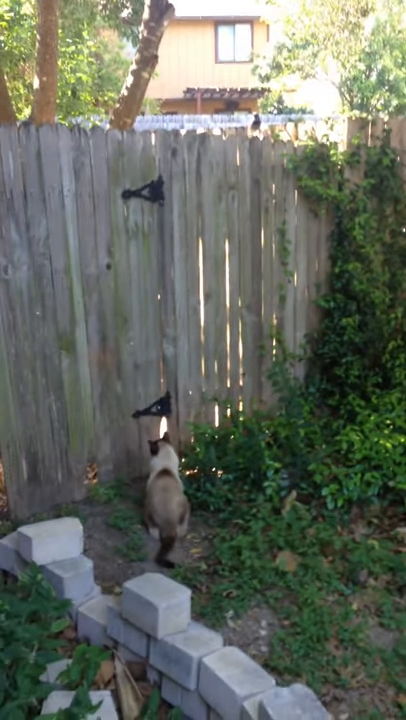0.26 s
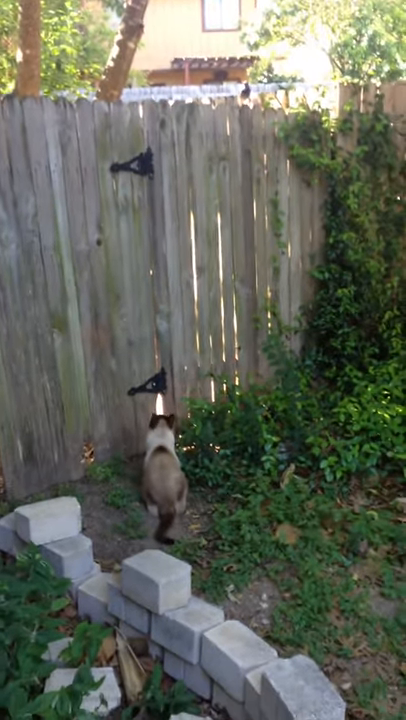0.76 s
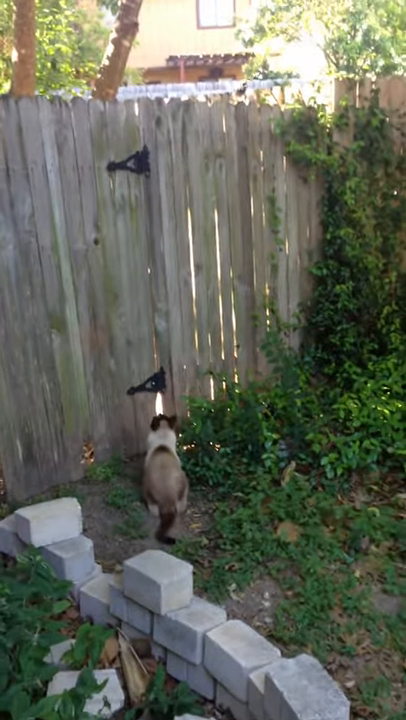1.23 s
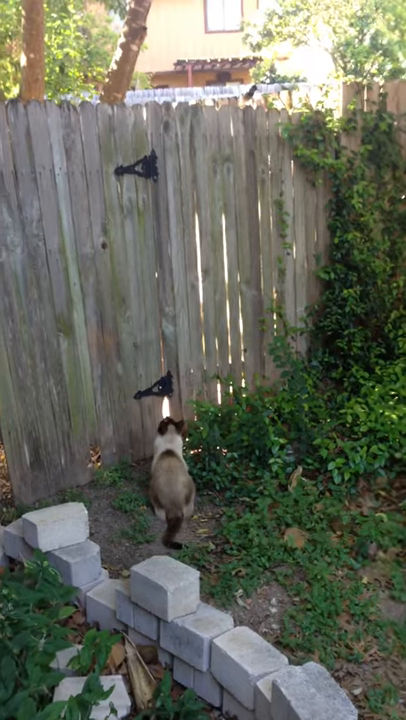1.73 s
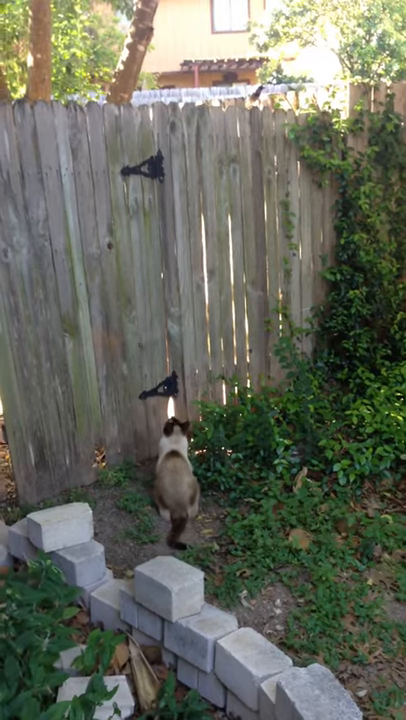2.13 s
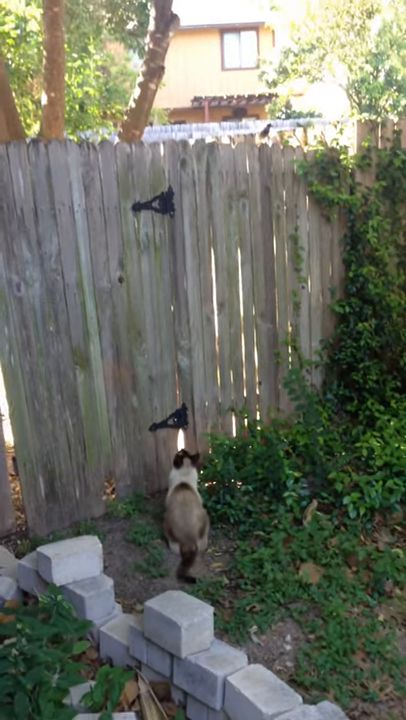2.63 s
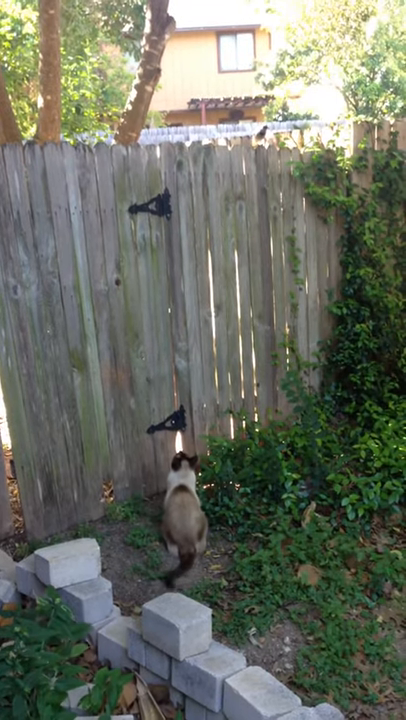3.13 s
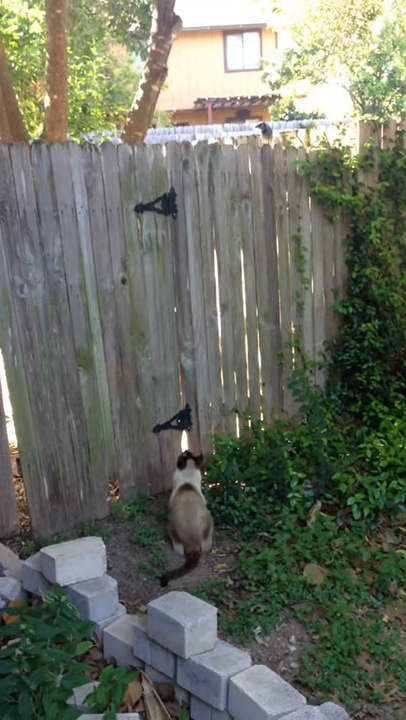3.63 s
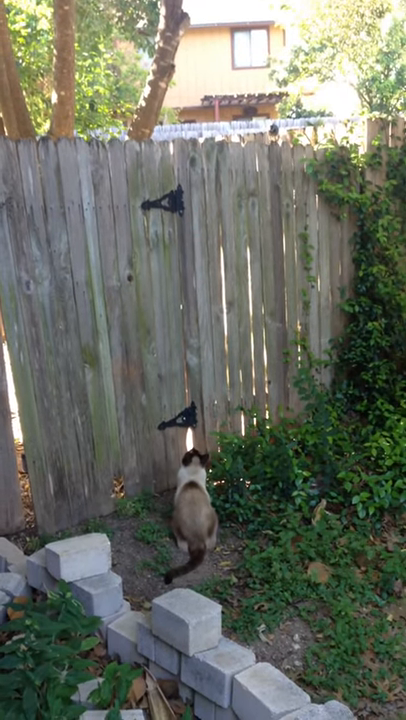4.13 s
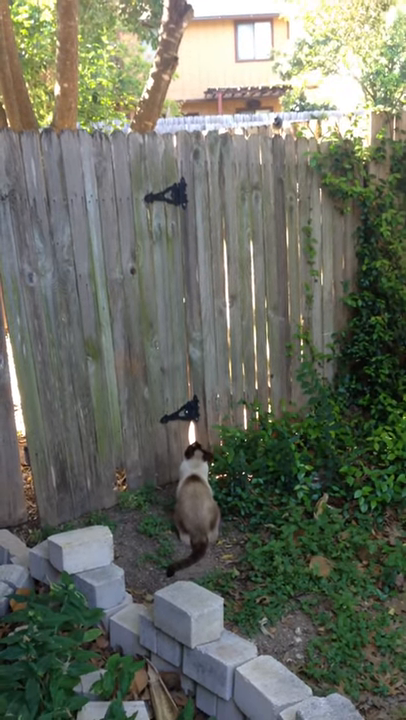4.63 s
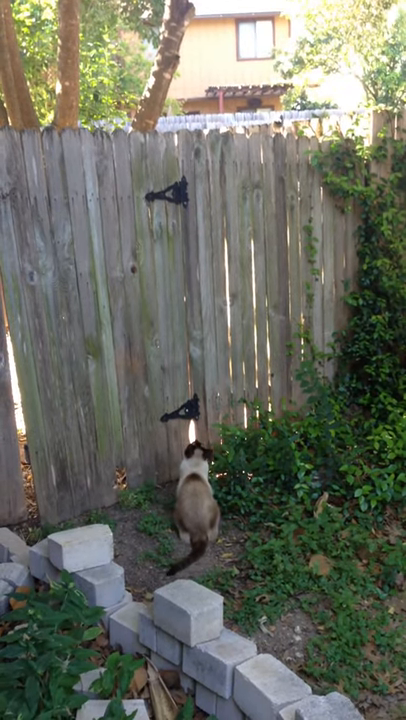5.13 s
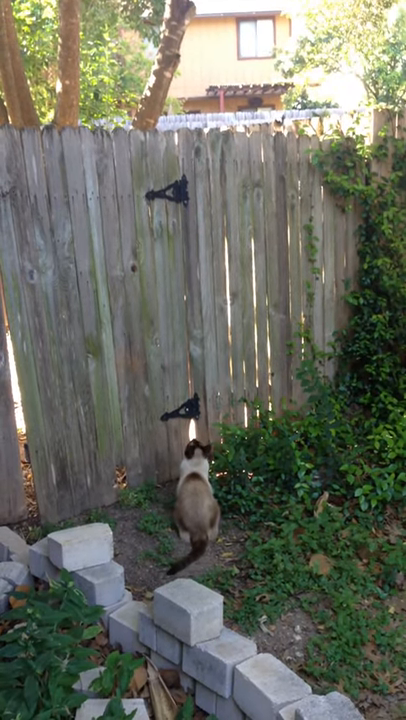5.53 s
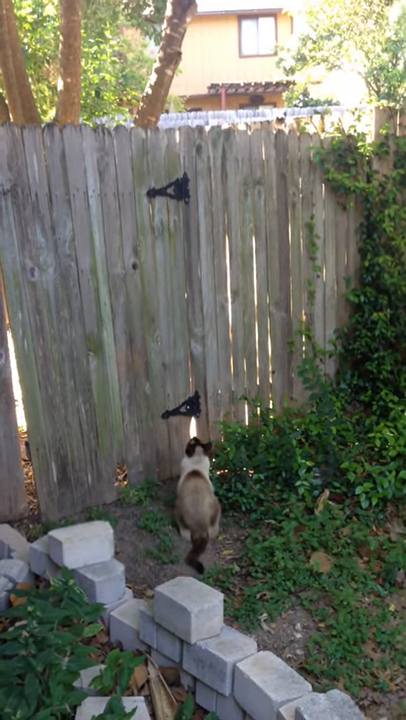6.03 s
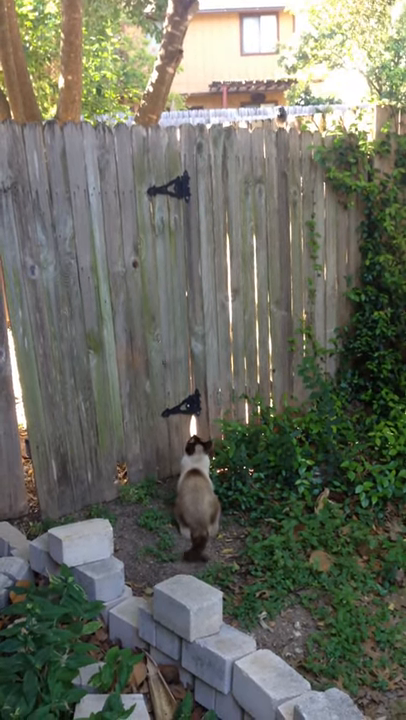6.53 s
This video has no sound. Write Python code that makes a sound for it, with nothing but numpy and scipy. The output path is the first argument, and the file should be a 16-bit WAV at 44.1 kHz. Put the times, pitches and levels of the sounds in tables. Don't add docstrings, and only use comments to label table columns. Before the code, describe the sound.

A nearby jay scolds in two quick pairs of piercing, raspy screams, the third the most strained. Between and after them come low, throaty dove coos from farther away, with small sparrow chirps and a faint buzzing bird call. Dry leaves click softly. Beneath lies steady far traffic, leaf rustle, a very faint machine hum and thin insect whine, picked up by a phone in a yard with short reflections.

```python
import sys
import numpy as np
from scipy import signal
from scipy.fft import rfft, irfft
from scipy.io import wavfile
from scipy.ndimage import uniform_filter1d

SR = 44100
rng = np.random.default_rng(int(sys.argv[2]) if len(sys.argv) > 2 else 0)


def gain_from_db(level_db):
    decades = np.asarray(level_db, float) / 20
    return 10 ** decades


def unload_wav(signal):
    wavfile.write(
        sys.argv[1],
        SR,
        np.round(np.clip(np.atleast_2d(signal).T, -1, 1) * 32767).astype(np.int16),
    )


N = 298116


def evened(x):
    return x / np.sqrt(np.mean(abs(x) ** 2) + 1e-20)


def read(points, hz):
    f, value = np.transpose(points)
    return np.interp(np.log(hz + 1), np.log(f + 1), value)


def curves(rows):
    s, *columns = np.transpose(rows)
    t = np.arange(s[0], s[-1], 1 / SR)
    return t, *(np.interp(t, s, c) for c in columns)


def shape(t, times, values):
    return np.interp(t, np.maximum.accumulate(times), values)


def add(mix, start_s, sound):
    part = mix[round(start_s * SR):][:len(sound)]
    part += sound[:len(part)]


def drift(size, hz):
    z = rng.standard_normal((size + 2000, 2)) @ [1, 1j]
    return evened(signal.lfilter(*signal.butter(2, hz, fs=SR), z)[2000:])


def coloured(x, spectrum):
    gain = gain_from_db(read(spectrum, np.fft.rfftfreq(len(x), 1 / SR)))
    return evened(irfft(rfft(x) * gain, len(x)))


def air():
    # freq_hz, density_db (per Hz)
    wash_spectrum = [(25, -32), (40, -5.5), (60, -4.5), (120, -1.5), (170, -0.5), (260, -13.5),
                     (330, -11.5), (450, -18), (650, -12.5), (900, -20), (1900, -24), (2900, -23.5),
                     (4500, -22.5), (7500, -26), (12000, -30.5), (15300, -31)]
    # centre_hz, width_hz, level_db
    machine = (1780, 70, -71.5)
    # time_s, level_db
    insect_level = [(0, -68), (.55, -78), (.9, -85), (2.2, -84), (2.55, -75), (3.3, -87), (4.3, -80),
                    (4.9, -73), (5.25, -84.5), (5.9, -94), (6.4, -70.5), (6.76, -78)]
    wash_db, insect_hz = -54.5, 14500

    frames, hz = N // 256 + 5, np.fft.rfftfreq(1024, 1 / SR)
    a, b, patches = rng.standard_normal((frames, 513, 3)).T
    patches = uniform_filter1d(patches, 12, 0)
    patches_db = 1.2 * evened(uniform_filter1d(patches, 14, 1))
    z = (a + 1j * b) * gain_from_db(read(wash_spectrum, hz)[:, None] + patches_db)
    wash = gain_from_db(wash_db) * evened(signal.istft(z, nperseg=1024, noverlap=768)[1][:N])

    t = np.arange(N) / SR
    hum_hz, hum_width_hz, hum_db = machine
    hum = gain_from_db(hum_db) * (drift(N, hum_width_hz) * np.exp(2j * np.pi * hum_hz * t)).real
    insect_gain = gain_from_db(np.interp(t, *np.transpose(insect_level)))
    insect = insect_gain * (drift(N, 12) * np.exp(2j * np.pi * insect_hz * t)).real
    return wash + hum + insect


def whistle(rows, hoarse, flutter_hz, edge_s):
    t, hz, db = curves(rows)
    flutter = evened(1 + hoarse * drift(len(t), flutter_hz))
    tone = np.exp(2j * np.pi * np.cumsum(hz) / SR) * flutter
    edges = np.clip(np.minimum(t - t[0], t[-1] - t) / edge_s, 0, 1)
    return np.sqrt(2) * gain_from_db(db) * tone.real * edges


def sparrow():
    # start_s, level_db
    chirps = [
        (.42, -65),
        (3.28, -59),
        (5.325, -63.5),
    ]
    # after_s, length_s, first_hz, top_hz, last_hz
    strokes = [
        (0, .054, 3366, 4900, 3090),
        (.042, .013, 5490, 4600, 3630),
        (.072, .028, 4290, 4900, 3900),
        (.104, .052, 3110, 3700, 2700),
    ]
    out = np.zeros(N)
    for start_s, db in chirps:
        for after_s, length_s, first_hz, top_hz, last_hz in strokes:
            rows = [(0, first_hz, db - 2), (length_s / 2, top_hz, db + 4), (length_s, last_hz, db)]
            add(out, start_s + after_s, whistle(rows, hoarse=.35, flutter_hz=100.1, edge_s=0.0022))
    return out


def yard(x):
    # freq_hz, t60_s
    far_decay = [
        (500, 1),
        (1500, 0.38),
        (4000, 0.53),
        (10000, 0.21),
    ]
    fence_t60_s, fence_db = .14, 12.5
    taps = np.zeros(SR)
    at = np.arange(200, SR - 20, 20)
    taps[at + rng.integers(0, 20, len(at))] = rng.choice([-1., 1.], len(at))
    hz, t, z = signal.stft(taps, SR, nperseg=256)
    decay = gain_from_db(-60 * t / read(far_decay, hz)[:, None]) + gain_from_db(fence_db - 60 * t / fence_t60_s)
    tail = signal.istft(z * decay, SR, nperseg=256)[1]
    return signal.fftconvolve(x, tail / np.linalg.norm(tail))[:N]


def sub_lines(phase, steady_s):
    size, lines = len(phase) // 64 + 1, np.arange(5, 80)
    z = rng.standard_normal((size, len(lines), 2)) @ [1, 1j]
    z = signal.lfilter([1], [1, -np.exp(-64 / SR / steady_s)], z, axis=0)
    z = z * (1 + 1.5 * (lines % 4 == 0))
    strength = np.repeat(z, 64, 0)[:len(phase)]
    return evened((strength * np.exp(1j * phase[:, None] * lines / 4)).real.sum(1))


def scream(rows, break_s, overtones_db, hoarse_db, strain):
    # freq_hz, density_db (per Hz)
    rasp_spectrum = [(650, -92), (1100, -60), (1460, -15.5), (2010, -26), (2190, -8.5), (2550, 1),
                     (2970, -14.5), (3390, -3.5), (3820, -0.5), (4860, -10.5), (6050, -6), (12200, -26),
                     (15000, -32.5)]
    # multiple, level_db
    clear = [(1, -37.5), (2, -23), (3, -16), (4, 0), (5, -21.5), (6, -18.5), (7, -18), (8, -4), (9, -12.5),
             (10, -13.5), (11, -15.5), (12, -18), (13, -21), (14, -20.5), (15, -27), (16, -23), (17, -30),
             (18, -30), (19, -47)]
    # multiple, level_db
    strained = [(1, -30), (2, -25), (3, -31.5), (4, 0), (5, -23.5), (6, -24), (7, -40), (8, -16), (9, -26),
                (10, -17), (11, -38), (12, -45.5), (13, -44.5), (14, -39), (15, -36.5), (16, -37.5),
                (17, -73), (18, -44.5), (19, -70)]
    settle_s, crack_s, release_s = 0.057, .1, 0.02

    t, hz, fourth_db = curves(rows)
    start, end = t[0], t[-1]
    stages = [start, start + settle_s, break_s, break_s + crack_s, end]
    release_db = -15 * np.clip(1 - (end - t) / release_s, 0, 1)

    start_db, settled_db, spent_db = -31.5, -4.5, -13.5
    bright_stages = [start, start + .3 * settle_s, start + settle_s, break_s, end - release_s]
    bright_db = shape(t, bright_stages, [start_db, 0.49 * start_db, settled_db, 0, spent_db])
    others_db = overtones_db + bright_db + release_db
    eighth_db = overtones_db + 8.5 - 6.5 * strain + 1.4 * bright_db + release_db
    second_db = -48 + shape(t, stages, [-8.5, 0, 6, 0, 0]) + release_db
    dip_after_s, dip_s = .06, 0.043
    second_db = second_db + (1 - strain) * -24 * np.exp(-((t - break_s - dip_after_s) / dip_s) ** 2)
    first_db = second_db - 27

    clear_db = -19 + 14.5 * strain
    rasp_stages = [start, start + 0.603 * settle_s] + stages[2:]
    rasp_db = hoarse_db + shape(t, rasp_stages, [3.5, clear_db, clear_db, 0, -5.5])
    wobble = .09 * strain + shape(t, stages, [.3, .055, .055, .25, .36])

    partials = strained if strain > .5 else clear
    hz = hz * (1 - .24 * np.exp(-((t - start) / .008) ** 2))
    phase = 2 * np.pi * np.cumsum(hz) / SR + .45 * wobble * drift(len(t), 90).real
    beat = 1.5 * wobble * np.cos(.29 * phase + .9 * drift(len(t), 20).real)
    top_db = 10 * np.log10(sum(gain_from_db(2 * db) for k, db in partials if k > 8))
    led = {1: first_db, 2: second_db, 4: fourth_db, 8: eighth_db}
    voice = np.zeros(len(t))
    for k, db in partials:
        fading = abs(1 + .45 * drift(len(t), 12)) if k not in led else 1
        flutter = 1 + min(k / 7, 2.4) * (wobble * drift(len(t), 30) + beat)
        opening_db = 22 * wobble * (k < 8)
        level = gain_from_db(led.get(k, others_db + db - top_db + opening_db))
        tone = (flutter * np.exp(1j * (k * phase + rng.uniform(0, 2 * np.pi)))).real
        voice += np.sqrt(2) * level * fading * tone

    rasp = coloured(sub_lines(phase, .035) + .3 * rng.standard_normal(len(t)), rasp_spectrum)
    rasp = rasp * evened(np.exp(.3 * drift(len(t), 220).real))
    edges = np.clip((t - start) / .0008, 0, 1) * np.clip((end - t) / 0.0027, 0, 1)
    return (voice + gain_from_db(rasp_db) * rasp) * edges


def jay():
    # time_s, pitch_hz, fourth_partial_db
    screams = [
        [(0.948, 730, -53), (0.964, 781, -28.5), (0.998, 804, -22), (1.1, 791.9, -17.5), (1.135, 790.6, -24),
         (1.21, 767.6, -21), (1.236, 761.5, -28), (1.325, 700.5, -29.5), (1.339, 683, -46)],
        [(1.587, 800, -39), (1.601, 789, -37.5), (1.645, 802.4, -26.5), (1.72, 799.7, -24), (1.787, 790.3, -26),
         (1.813, 777, -21), (1.905, 747.1, -32), (1.962, 708.4, -31), (1.977, 684, -46)],
        [(3.401, 836, -58), (3.415, 806, -25.5), (3.433, 806, -20), (3.478, 795.3, -19.5), (3.505, 791, -11),
         (3.531, 777.4, -30.5), (3.623, 760, -26.5), (3.727, 693, -31), (3.742, 688, -54)],
        [(3.826, 770, -49), (3.846, 782, -23), (3.888, 796.5, -22), (3.98, 788.6, -23), (4.04, 782.1, -20),
         (4.09, 769, -22), (4.11, 767.6, -28), (4.226, 700.5, -33), (4.241, 678, -52)],
    ]
    # break_s, overtones_db, rasp_db, strain (0-1)
    breaks = [
        (1.13, -30.5, -28.5, 0.16),
        (1.78, -32.5, -31, 0.37),
        (3.51, -32, -28.5, 0.93),
        (4.03, -31.5, -29, 0.21),
    ]
    out = np.zeros(N)
    for rows, voice in zip(screams, breaks):
        add(out, rows[0][0], scream(rows, *voice))
    return out


def coo(length_s, first_hz, last_hz, db, bend, peak, scoop):
    throat_hz, scoop_s, edge_db = 560, 0.01516, -7.5
    u = np.linspace(0, 1, 60)
    hz = first_hz + (last_hz - first_hz) * u ** bend
    hz = hz + scoop * (throat_hz - first_hz) * np.exp(-(u * length_s / scoop_s) ** 2 / 2)
    rise, fall = (1 - scoop) * (1 - u / peak), (u - peak) / (1 - peak)
    swell_db = edge_db * np.where(u < peak, rise, fall) ** 2
    rows = np.transpose([u * length_s, hz, db + swell_db])
    return whistle(rows, hoarse=.25, flutter_hz=45, edge_s=.012)


def doves():
    # start_s, length_s, first_hz, last_hz, level_db
    droops = [(2.25, 0.0486, 730, 704, -54.5), (2.34, 0.042, 697, 690, -51),
              (2.865, 0.056, 663.3, 656, -57.5), (3.78, 0.22, 677, 670, -56), (3.9, 0.104, 676, 597, -45),
              (4.17, .14, 705, 640, -47), (4.4, 0.075, 637, 684, -47.5), (4.5, 0.17, 734, 690.5, -66.5),
              (5.35, 0.24, 673, 647, -55), (5.54, 0.1, 658, 645, -42.5), (5.65, 0.094, 626, 627, -48),
              (5.8, .18, 700, 600, -59), (6.37, 0.4, 726, 649, -55)]
    # start_s, length_s, first_hz, last_hz, level_db
    slides = [(2.26, 0.12, 560, 614, -47), (2.83, 0.081, 615, 537, -49), (3.62, 0.17, 585, 634, -57),
              (3.73, 0.066, 560, 621, -48), (3.96, 0.0938, 595, 539, -46), (4.28, 0.13, 541, 611, -44.5),
              (4.36, 0.277, 554, 533.5, -55.5), (5.11, 0.17, 610, 550, -49.5), (5.52, 0.094, 560, 620, -54),
              (5.68, 0.12, 590, 536, -45.5), (6.135, 0.1208, 548, 606, -45.5), (6.3, 0.109, 575, 528, -52),
              (6.61, 0.072, 560, 472, -63)]
    # start_s, length_s, top_hz, last_hz, level_db
    hoots = [
        (2.565, .295, 736, 629, -47),
        (3.425, .11, 746.8, 660, -44.5),
        (3.985, 0.3, 751.5, 664, -56),
        (4.64, 0.17, 658, 581, -47.5),
        (4.79, 0.2, 750, 606, -54),
        (5.04, 0.13, 695, 650, -55.5),
        (5.255, 0.067, 723, 646, -47),
        (6.195, 0.2, 670, 613, -49),
        (6.48, 0.16, 644.5, 612.2, -47.5),
    ]
    kinds = [(hoots, 2, 0.12, 1), (droops, 2.7, .55, 0), (slides, 0.8, .35, 0)]
    out = np.zeros(N)
    for notes, *manner in kinds:
        for start_s, *note in notes:
            add(out, start_s, coo(*note, *manner))
    return out


def distant_buzz():
    # start_s, level_db, pitch_factor
    calls = [
        (2.975, -59.5, 1.024),
        (4.635, -58.5, 1.016),
        (6.641, -67, .93),
    ]
    # after_s, pitch_hz, level_db
    glide = [
        (0, 3900, 3.5),
        (.03, 3714, 0),
        (.07, 3280, 4),
        (.1, 3380, -8.5),
        (.2, 3450, -10),
        (.26, 3270, -32),
    ]
    out = np.zeros(N)
    for start_s, db, factor in calls:
        rows = np.multiply(glide, [1, factor, 1])
        add(out, start_s, gain_from_db(db) * whistle(rows, hoarse=2.5, flutter_hz=264.7, edge_s=0.0085))
    return out


def leaves():
    # start_s, peak_db, pitch_hz
    snaps = [
        (4.4326, -42, 1920),
        (4.46, -45, 1980),
        (6.5955, -49, 2010),
        (6.6952, -49.5, 1970),
    ]
    out, t = np.zeros(N), np.arange(600) / SR
    for start_s, db, hz in snaps:
        band = signal.butter(1, [.5 * hz, 2.5 * hz], "band", fs=SR)
        snap = signal.lfilter(*band, rng.standard_normal(len(t)))
        add(out, start_s, gain_from_db(db - 11.0) * evened(snap) * np.exp(-t / 0.016))
    return out


def scene():
    floor = air()
    far = sparrow() + distant_buzz()
    near, cooing = jay(), doves()
    echo = yard(gain_from_db(-6.0) * near + gain_from_db(-6.5) * cooing + gain_from_db(-3) * far)
    return (near + cooing + far + echo + leaves() + floor)[None]


def roll_off(x):
    return signal.sosfilt(signal.butter(12, 15600, fs=SR, output="sos"), x)


def record(dry):
    low_pass = signal.firwin(511, 15400, window=("kaiser", 9), fs=SR)
    limited = signal.oaconvolve(dry, low_pass[None], "same")
    limited = signal.sosfilt(signal.butter(3, 42, "high", fs=SR, output="sos"), limited)
    return roll_off(limited)


dry = scene()
out = record(dry)
unload_wav(out)
```